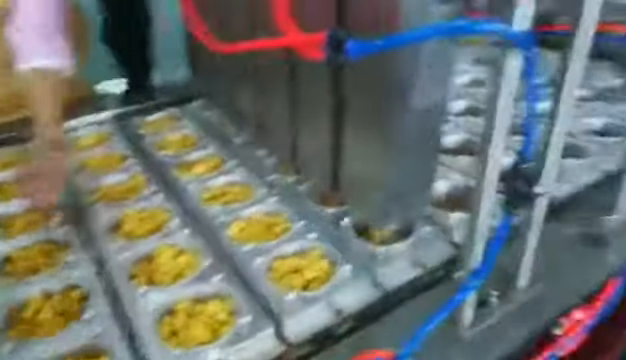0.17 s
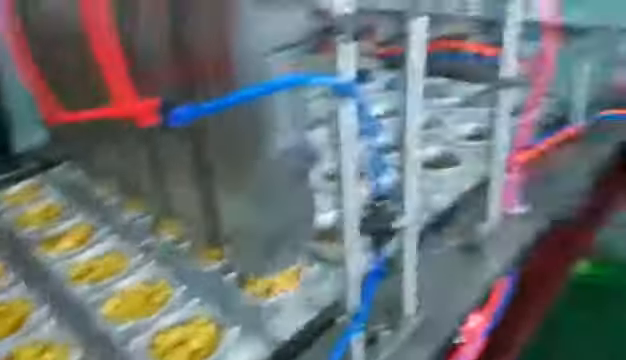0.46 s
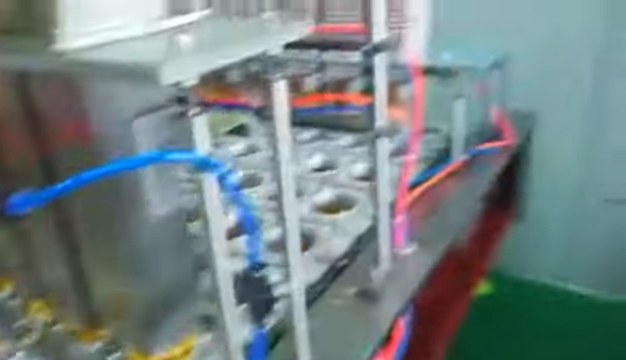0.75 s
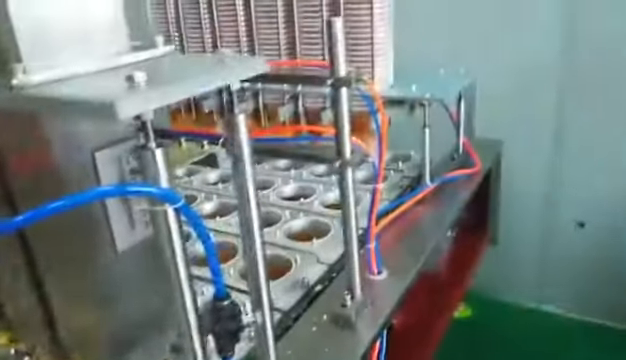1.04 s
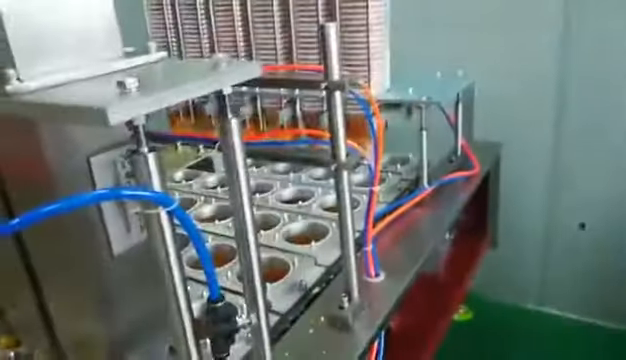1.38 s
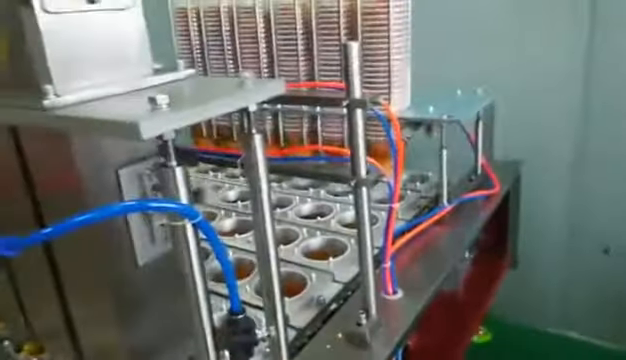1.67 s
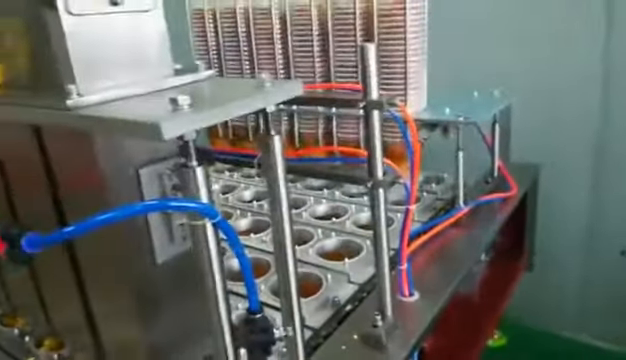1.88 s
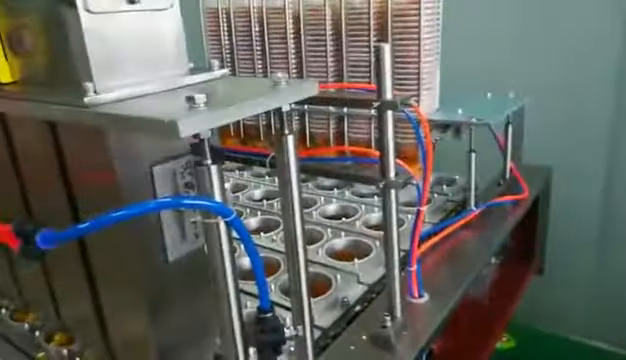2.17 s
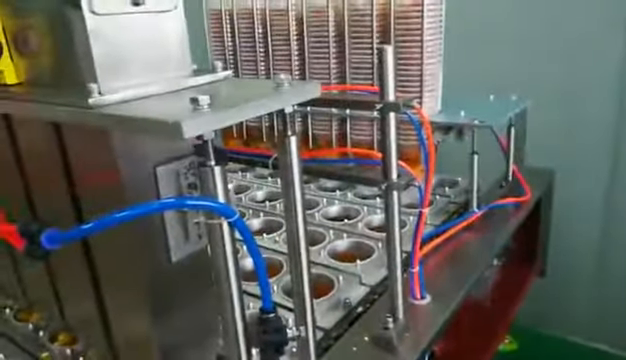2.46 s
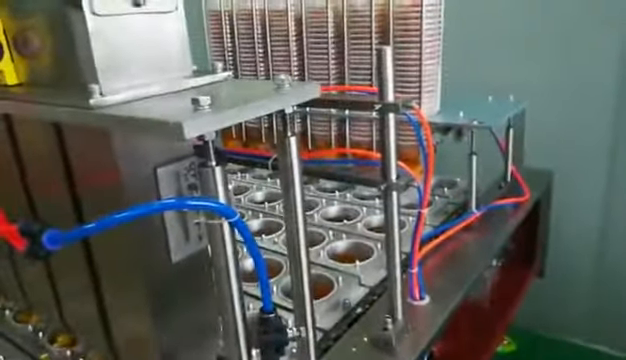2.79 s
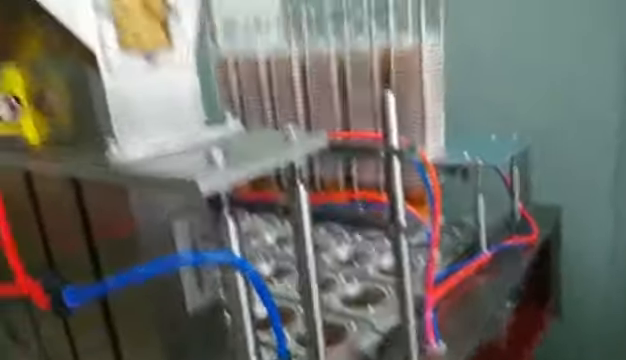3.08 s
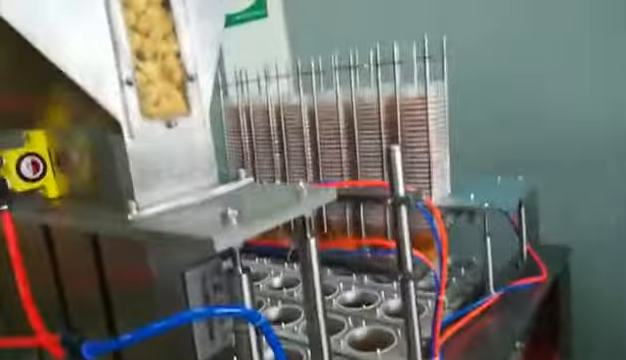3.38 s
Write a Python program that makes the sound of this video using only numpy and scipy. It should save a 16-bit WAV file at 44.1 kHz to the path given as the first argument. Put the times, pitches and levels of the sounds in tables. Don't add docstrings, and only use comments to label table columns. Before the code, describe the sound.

Pneumatic packing machine cycles: snacks rattle, chain drones, air hisses with falling whistle, steel clanks

```python
import sys
import numpy as np
from scipy import signal
from scipy.fft import rfft, irfft, next_fast_len
from scipy.io import wavfile
from scipy.ndimage import uniform_filter1d

SR = 44100
rng = np.random.default_rng(int(sys.argv[2]) if len(sys.argv) > 2 else 0)


def store_pcm(level_fs):
    pcm = np.round(np.clip(level_fs, -1, 1) * 32767).astype(np.int16)
    wavfile.write(sys.argv[1], SR, np.atleast_2d(pcm).T)


def level_to_linear(level):
    exponent = np.asarray(level, float) / 20
    return 10 ** exponent


N = 156114

# (time [s], level [dB])
CHUTE_HITS = [
    (.1918, -14),
    (.1948, -7),
]


def rms_one(x):
    return x / np.sqrt(np.mean(x ** 2) + 1e-20)


def in_time(rows):
    s, *columns = np.transpose(rows)
    return [np.interp(np.arange(N) / SR, s, c) for c in columns]


def gated(rows):
    t = np.arange(N) / SR
    return level_to_linear(in_time(rows)[0]) * (t >= rows[0][0]) * (t <= rows[-1][0] + .01)


def at_hz(points, hz):
    return np.interp(np.log(hz + 1), np.log(np.array(points)[:, 0]), np.array(points)[:, 1])


def drift(rate):
    r = np.exp(-80 * np.pi * rate / SR)
    slow = signal.lfilter([1], [1, -2 * r, r * r], rng.standard_normal(N // 40 + 2002))[2000:]
    return np.interp(np.arange(N) / 40, np.arange(len(slow)), rms_one(slow))


def band(x, low_hz, high_hz):
    return signal.sosfilt(
        signal.butter(2, [low_hz, min(high_hz, .4 * SR)], "band", fs=SR, output="sos"), x)


def resonate(x, peaks):
    out = 0
    for hz, width, db in peaks:
        r = np.exp(-np.pi * width / SR)
        ringing = signal.lfilter([1, 0, -1], [1, -2 * r * np.cos(2 * np.pi * hz / SR), r * r], x)
        out = out + level_to_linear(db) * rms_one(ringing)
    return out


def ring(clicks, hz, t60):
    r, w = level_to_linear(-60 / (t60 * SR)), 2 * np.pi * hz / SR
    return signal.lfilter([0, np.sin(w)], [1, -2 * r * np.cos(w), r * r], clicks)


def patchy(spectrum, patchy_db, rate):
    out, together, white = 0, drift(rate), rng.standard_normal((2, N))
    edges = spectrum[0][0] * 2 ** (np.arange(0, 30) / 3)
    for k, (low, high) in enumerate(zip(edges, edges[1:])):
        if low < 8000:
            flicker_db = patchy_db * (.3 * together + drift(rate))
            level_db = at_hz(spectrum, np.sqrt(low * high)) + flicker_db
            out = out + level_to_linear(level_db) * band(white[k % 2], low, high)
    return rms_one(out)


def grains(rate, spread_db):
    hits = rng.random(N) < rate / SR
    sizes = level_to_linear(spread_db * np.minimum(rng.exponential(1, N), 4))
    return hits * sizes * rng.choice([-1, 1], N) + 1e-9


def press():
    # (frequency [Hz], level [dB], t60 [s])
    modes = [(296, -15, .1), (338, -6.5, .2), (372, -20, .08), (656, -13, .12), (700, -12, .11),
             (770, -8, .11), (830, -10, .07), (880, -9, .18), (934, -10, .08), (960, -10, .11),
             (1012, -8, .08), (1297, -16, .16), (528, -24, .05)]
    # (time [s], level [dB])
    contacts = [(1.644, -27), (1.651, -15), (1.655, -15.5), (1.664, -15), (1.671, -12.5), (1.679, -19.5),
                (1.686, -12), (1.727, -30), (1.761, -25), (1.79, -29.5), (1.932, -26.5), (1.955, -25.5),
                (1.974, -29.5)]
    base_top_hz, release_s, release_base_db = 450, 1.85, -12
    s, db = np.transpose(contacts)
    luck, out = rng.normal(0, 2, (len(s), len(modes))), np.zeros(N)
    signs = np.sign(np.roll(luck, 1))
    for k, (hz, level_db, t60) in enumerate(modes):
        clicks = np.full(N, 1e-18)
        release_db = release_base_db * (s > release_s) * (hz < base_top_hz)
        clicks[(s * SR).astype(int)] = level_to_linear(db + level_db + luck[:, k] + release_db) * signs[:, k]
        out += (-1) ** k * ring(clicks, hz, t60)
    return out


def vent():
    # (time [s], flow level [dB], whistle pitch [Hz], whistle over hiss [dB])
    flow = [
        (1.15, -41.5, 6350, 4.5),
        (1.175, -17.5, 6400, -2.5),
        (1.197, -20.5, 6230, -4),
        (1.228, -19, 5430, -3.5),
        (1.243, -19, 5340, -1.5),
        (1.292, -23.5, 4260, -2.5),
        (1.328, -23, 4270, -0.5),
        (1.36, -22.5, 3950, -8.5),
        (1.49, -24.5, 3800, -32),
        (1.62, -42, 3800, -5),
    ]
    # (frequency [Hz], density [dB per Hz])
    air = [(290, -47), (500, -37.5), (1470, -16), (1710, -8.5), (2010, -2), (5850, 4.5), (7640, -1),
           (8000, -72), (10400, -100), (17600, -120)]
    width_hz, wander_hz, breaks_db = 130, 80, 1.2
    _, hz, over_db = in_time(flow)
    wobble = drift(width_hz) + 1j * drift(width_hz) + .8
    phase = 2 * np.pi * np.cumsum(hz + wander_hz * drift(25)) / SR
    tone = rms_one(np.real(wobble * np.exp(1j * phase))) * level_to_linear(breaks_db * drift(30))
    return gated(flow) * (patchy(air, patchy_db=1.8, rate=16) + level_to_linear(over_db) * tone)


def blow():
    # (time [s], flow level [dB])
    flow = [(1.94, -42), (1.965, -26.5), (2.04, -23.5), (2.15, -21.5), (2.26, -25), (2.34, -26),
            (2.43, -27), (2.5, -27), (2.75, -27.5), (3.0, -27.5), (3.1, -27.5), (3.25, -25), (3.4, -24.5),
            (3.54, -26)]
    # (frequency [Hz], density [dB per Hz])
    air = [(530, -53), (900, -25), (1470, -17.5), (2650, -7), (4100, -8.5), (6420, -1.5), (7500, -19.5),
           (7710, -18.5), (8000, -47), (10400, -77), (17600, -120)]
    # (frequency [Hz], width [Hz], level [dB])
    nozzle = [(5890, 120, -16), (6670, 64, -24), (6740, 160, -12.5)]
    tones = level_to_linear(2.0 * drift(9)) * resonate(rng.standard_normal(N), nozzle)
    return gated(flow) * (patchy(air, patchy_db=.9, rate=12) + tones)


def pour():
    # (time [s], level [dB])
    fall = [
        (.0, -38.5),
        (.09, -46.5),
        (.13, -30),
        (.2, -25.5),
        (.24, -25.5),
        (.31, -32),
        (.42, -38.5),
        (.55, -50),
    ]
    # (frequency [Hz], width [Hz], level [dB])
    chute = [(304, 98, -5), (540, 260, 1.5), (1145, 350, 3.5), (1504, 400, 2.5), (2015, 200, 6),
             (2700, 500, -7), (3800, 1300, -1.5)]
    return gated(fall) * rms_one(resonate(grains(1800, spread_db=2.0), chute))


def tick():
    wall_hz = (2120, 2600)
    ring_s = .0016
    t, out = np.arange(N) / SR, np.zeros(N)
    for s, db in CHUTE_HITS:
        swell = np.exp(-.5 * ((t - s - ring_s) / (ring_s / 2)) ** 2)
        for hz in wall_hz:
            out += level_to_linear(db) * np.sin(2 * np.pi * hz * (t - s)) * swell
    return out / 1.5


def chain():
    # (time [s], level [dB])
    stroke = [
        (.74, -61),
        (.79, -38.5),
        (.93, -33.5),
        (1.15, -31.5),
        (1.35, -32),
        (1.56, -29.5),
        (1.64, -40),
    ]
    # (frequency [Hz], width [Hz], level [dB])
    frame = [(143.6, 8.8, -14), (173, 20, -6), (238, 31, -2), (287.7, 33, -0.6), (1071, 55, -10),
             (1260, 22, -9), (1461, 40, -4.5), (1755, 110, -10.5)]
    return gated(stroke) * rms_one(resonate(grains(400, spread_db=1.5), frame))


def stops():
    # (time [s], rms level [dB], centre [Hz], width [octaves], t60 [s])
    bursts = [(.04, -34.5, 580, 0.8, 0.3), (.065, -33.5, 280, 0.26, 0.27), (.762, -21.5, 6240, .8, .2),
              (.76, -31.5, 210, 3.5, 0.13), (1.7, -35, 93, 2.3, 0.97), (1.4, -35.5, 880, 0.58, 0.45),
              (1.648, -19, 1880, 0.73, 0.32), (1.658, -19.5, 4570, 0.69, .4), (1.65, -20, 880, 0.54, .25),
              (1.94, -28.5, 796, .45, 0.31), (3.37, -29, 7350, 0.065, .6), (1.8, -37.5, 1700, 1.3, 1.1),
              (1.67, -18.5, 960, 0.29, .25), (1.165, -26, 6800, .04, .2), (1.228, -27, 4100, .05, .2),
              (1.932, -28, 1740, 0.7, 0.39), (2.128, -24.5, 2270, 1.1, 0.5), (2.105, -35.5, 940, .6, 0.64),
              (2.13, -32, 1300, .7, 0.57), (2.3, -31.5, 151.5, 0.3, 0.9), (2.468, -19.5, 5200, 0.82, .1),
              (2.4684, -27, 1400, 3.3, .12), (2.56, -29.5, 1430, 1.8, 0.42), (2.558, -38.5, 315, 1.3, 0.76),
              (2.942, -23.5, 5900, 0.08, 0.23), (2.99, -26.5, 6550, 0.049, .3),
              (3.46, -31, 3300, 0.08, 0.31), (3.41, -31.5, 2750, 0.056, 0.34),
              (3.36, -31, 3750, 0.044, 0.37)]
    attack_s = .007
    out, t = np.zeros(N + SR), np.arange(SR) / SR
    for s, db, hz, octaves, t60 in bursts:
        half = 2 ** (octaves / 2)
        burst = rms_one(band(rng.standard_normal(SR), hz / half, hz * half))
        rise = np.minimum(t / min(attack_s, t60 / 20), 1)
        out[int(s * SR):int(s * SR) + SR] += burst * rise * level_to_linear(db - 60 * t / t60)
    return out[:N]


def snaps():
    # (time [s], level [dB])
    latches = [(0.7618, -26), (.7702, -19.5), (.7755, -21), (0.7814, -24), (2.4725, -23.5), (2.477, -22.5),
               (2.482, -23.5), (2.5554, -23.5), (2.566, -21.5), (3.0803, -26.5), (3.1368, -25.5),
               (3.384, -21.5)]
    # (frequency [Hz], t60 [s], level [dB])
    housing = [(160, .03, -15.5), (416, .012, -11), (1558, .012, -8.5), (2800, 0.0053, -5.5),
               (5600, .008, -1), (6700, .008, -1.5)]
    s, db = np.transpose(latches)
    luck, out = rng.normal(0, 3, (len(s), len(housing))), np.zeros(N)
    for k, (hz, t60, level_db) in enumerate(housing):
        clicks = np.full(N, 1e-18)
        clicks[(s * SR).astype(int)] = -level_to_linear(db + level_db + luck[:, k])
        out += ring(clicks, hz, t60)
    return out


def hall():
    # (frequency [Hz], density [dB per Hz])
    colour = [(12, -19.5), (20, -11.5), (113, -5.5), (285, -4), (636, -17.5), (758, -10.5), (2590, -10.5),
              (7060, -6), (8000, -4.5), (10400, -70), (17600, -120)]
    # (time [s], swell of the leak [dB])
    leak = [(0, 1), (.55, -0.5), (.8, 2), (1.6, 0), (1.9, 0), (2.4, -2), (3.0, -5), (3.54, -2.5)]
    noise = level_to_linear(-32) * patchy(colour, patchy_db=1.37, rate=15)
    hum = band(noise, 10, 210)
    return hum + level_to_linear(in_time(leak)[0]) * (noise - hum)


def room(x, wet_db):
    t, t60 = np.arange(SR) / SR, 0.89
    tail = band(rng.standard_normal(SR), 100, 4100) * level_to_linear(-60 * t / t60) * np.minimum(t / 0.0087, 1)
    return x + level_to_linear(wet_db) * signal.fftconvolve(x, tail / np.sqrt(np.sum(tail ** 2)))[:N]


def ports(x, tilt):
    # (frequency [Hz], side over mid [dB])
    side_level = [(30, -42), (60, -35.5), (170, -31.5), (350, -10), (700, 0), (1400, -3.5), (2800, 0.8),
                  (7600, -1.3)]
    # (frequency [Hz], left over right [dB])
    left_right = [(100, 0), (300, 0), (600, 2.5), (1200, -4.5), (2500, -3.5), (5000, -1.5), (7600, -3)]
    # (frequency [Hz], part of the side that lags the mid by a plain quarter cycle [0-1])
    lag_share = [(300, .9), (700, 0.77), (1400, 0.59), (2800, 0.62), (6000, 0.24)]
    size = next_fast_len(N + 8192)
    hz, mid = np.arange(size // 2 + 1) * SR / size, rfft(x, size)
    scatter, share = 1, np.clip(at_hz(lag_share, hz), 0, .99)
    for lag_s in (.0031, .0073, .0117, .0169, .023):
        z = np.exp(-2j * np.pi * hz * lag_s)
        scatter = scatter * (z - .5) / (1 - .5 * z)
    side = mid * level_to_linear(at_hz(side_level, hz)) * (np.sqrt(1 - share ** 2) * scatter - 1j * share)
    lean = level_to_linear(tilt * at_hz(left_right, hz) / 2)
    return np.array([irfft((mid + side) * lean, size)[:N], irfft((mid - side) / lean, size)[:N]])


def swing(rows):
    return level_to_linear(in_time(rows)[0] * [[.5], [-.5]])


def scene():
    # (time [s], balance [dB])
    near_pan = [(0, 0.5), (.7, -0.5), (1.1, -0.5), (1.7, 0.5), (2.2, 0), (2.9, 0), (3.2, 0), (3.54, 0)]
    blow_pan = [(1.9, 4), (2.7, -2), (3.0, -0.5), (3.2, 1), (3.54, 0.5)]
    echoing = room(vent() + stops() + snaps(), wet_db=-11.5)
    near = ports(hall() + chain() + pour() + echoing, tilt=0.72) * swing(near_pan)
    blowing = ports(blow(), tilt=0.79) * swing(blow_pan)
    clanking = ports(room(press() + tick(), wet_db=-17), tilt=0.43)
    return near + blowing + clanking


def thin_stream(x):
    # (frequency [Hz], share of bands dropped [0-1])
    starved = [(300, 0), (600, .05), (1500, .04), (2200, .15), (4200, .17), (5000, .04), (7600, .03)]
    # (time [s], factor on dropped bands)
    strain = [(0, 1), (.6, 1.3), (1.1, .8), (2.2, .8), (2.7, 1.8), (3.1, 1.5), (3.35, 1.9), (3.54, 1.9)]
    # (time [s], level [dB])
    open_top = [(.768, -28), (1.18, -26), (1.95, -29), (2.485, -26), (3.2, -22), (3.425, -17)]
    sharpen, waver_db, jump_db, cutoff_hz = .36, 1.8, 3.8, 7570
    hz, s, z = signal.stft(x, SR, "cosine", 2822)
    size_now = np.abs(z) + 1e-12
    sharp = (size_now / uniform_filter1d(size_now, size=24, axis=1)) ** sharpen
    level = 10 * np.log10(np.sum(size_now ** 2, axis=(0, 1)))
    steady = np.abs(np.roll(level, -1) - np.roll(level, 1)) < jump_db
    steady &= np.abs(s - CHUTE_HITS[-1][0]) > .033
    bands, pairs = np.ix_(np.arange(len(hz)) // 7, np.arange(len(level)) * 2 // 3)
    drop_share = np.outer(at_hz(starved, hz), np.interp(s, *np.transpose(strain)))
    kept = rng.random(z.shape[1:])[bands, pairs] > drop_share
    waver = level_to_linear(waver_db * rng.standard_normal(z.shape[1:])[bands, pairs])
    thinned = steady & (hz > starved[0][0])[:, None]
    gain = np.where(thinned, .8 * sharp * waver * (kept + .08), 1)
    leak = sum(level_to_linear(db) * (np.abs(s - at) < .017) for at, db in open_top)
    top = np.where((hz < cutoff_hz)[:, None], 1, np.outer(hz < 8200, leak))
    return signal.istft(z * gain * top, SR, "cosine", 2822)[1][:, :N]


def bright_ticks():
    # (time [s], level [dB])
    tick_times = [
        (3.4197, -40),
        (3.423, -15.5),
    ]
    clicks = np.zeros(N)
    for s, db in tick_times:
        clicks[int(s * SR)] = level_to_linear(db)
    return band(clicks, 7000, 16000)


def roll_off(x):
    return signal.sosfilt(signal.butter(12, 16000, fs=SR, output="sos"), x)


def record(dry):
    mix = thin_stream(dry) + bright_ticks()
    return roll_off(mix)


dry = scene()
out = record(dry)
store_pcm(out)
```